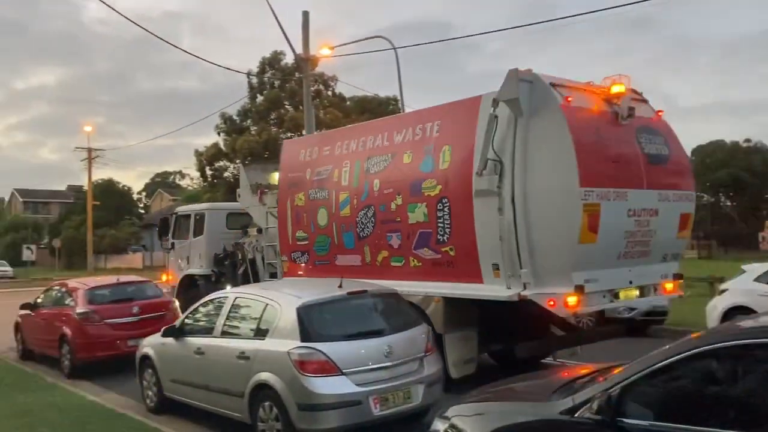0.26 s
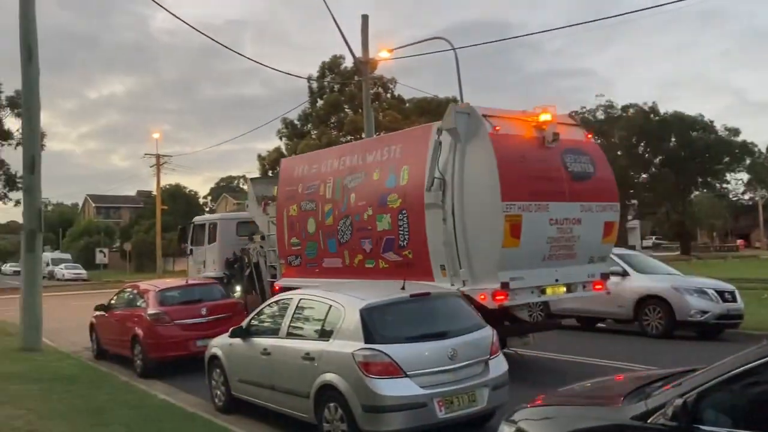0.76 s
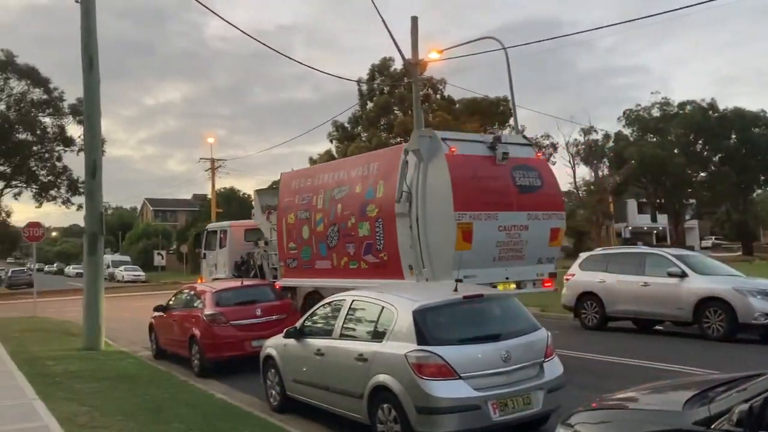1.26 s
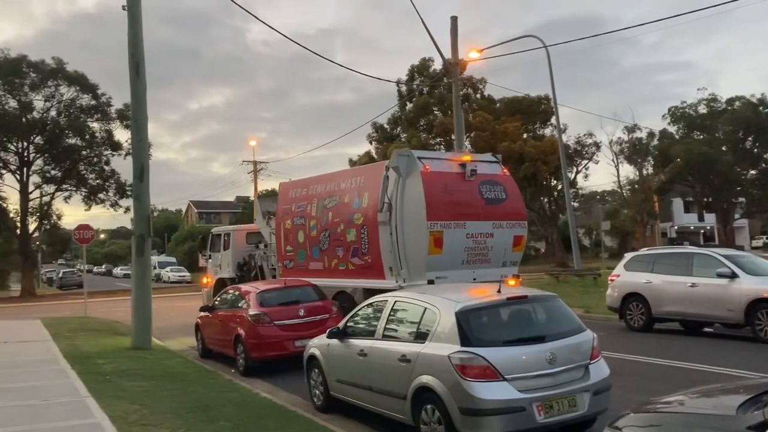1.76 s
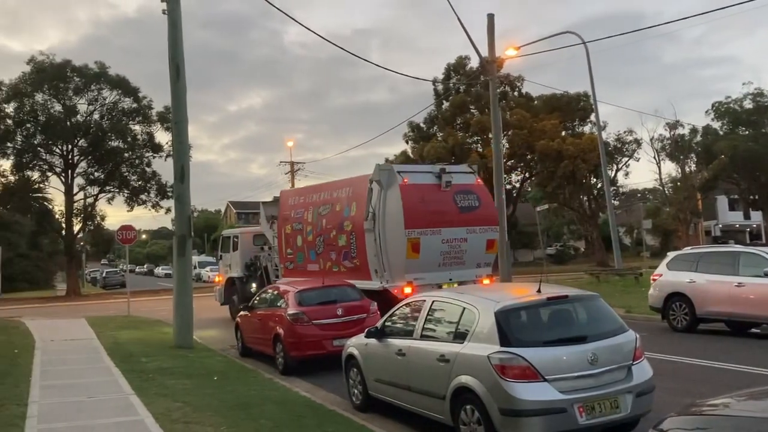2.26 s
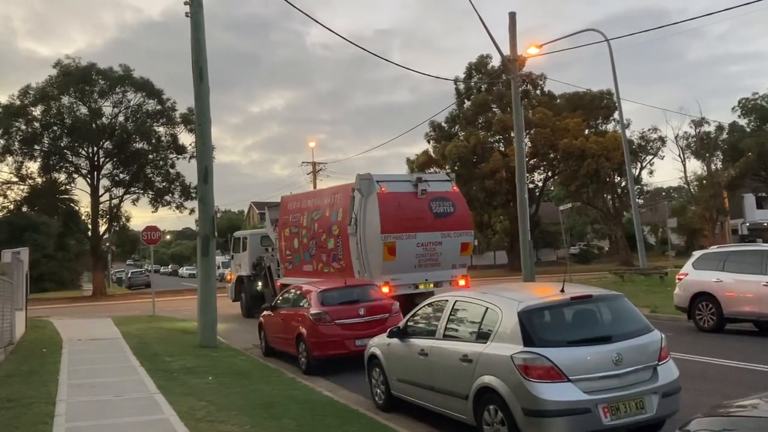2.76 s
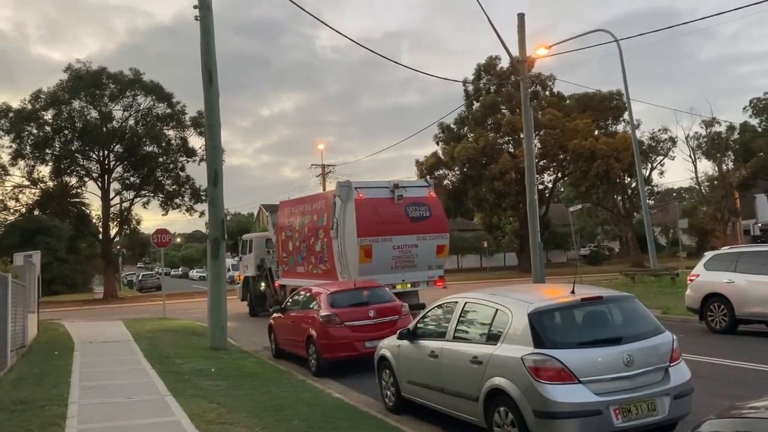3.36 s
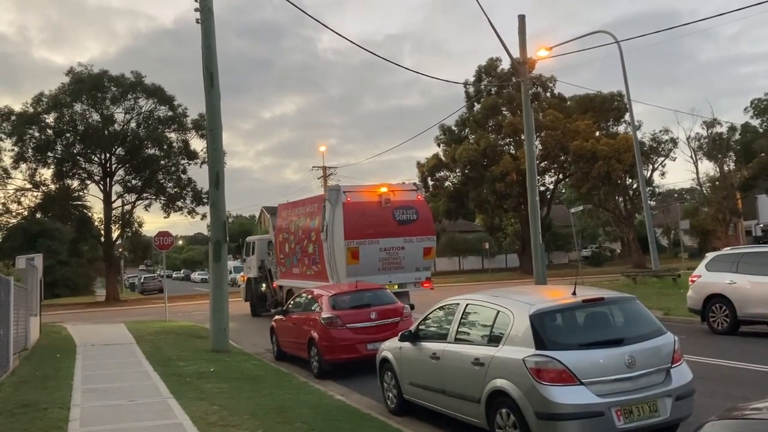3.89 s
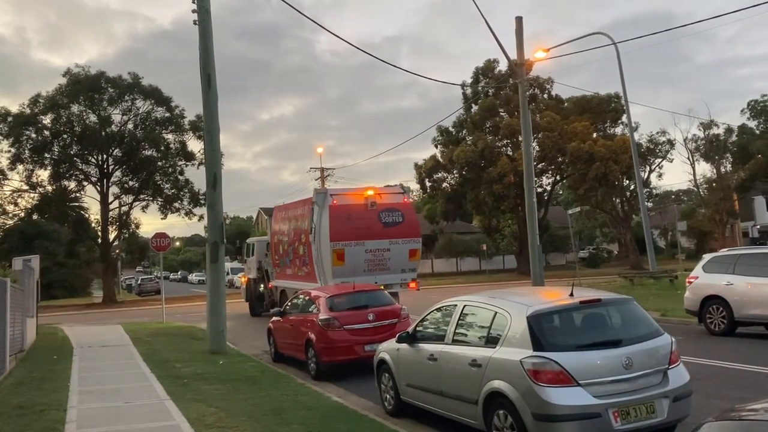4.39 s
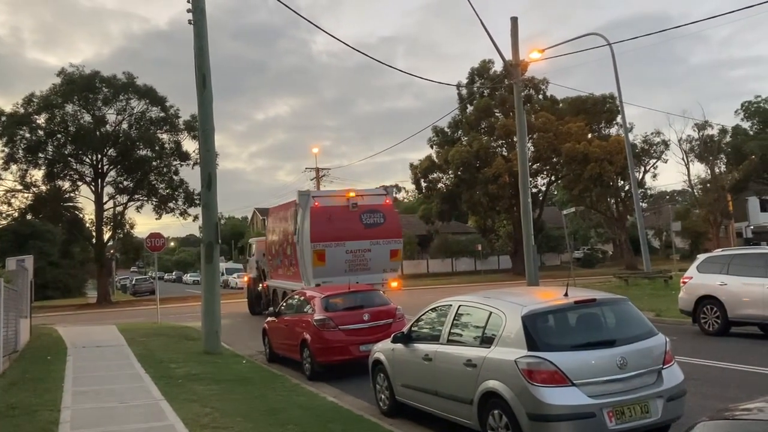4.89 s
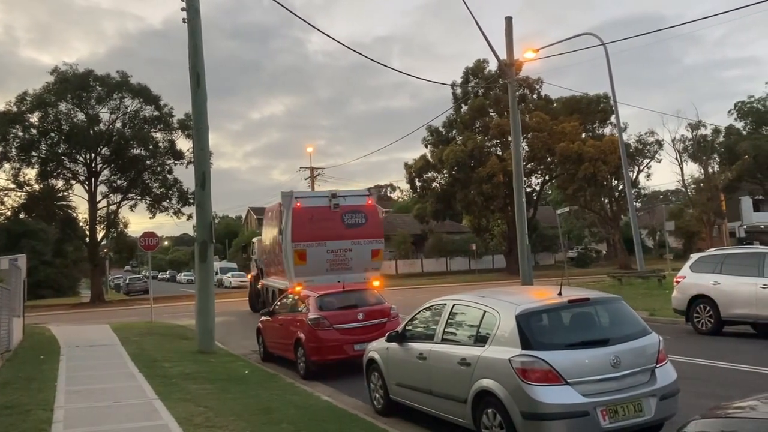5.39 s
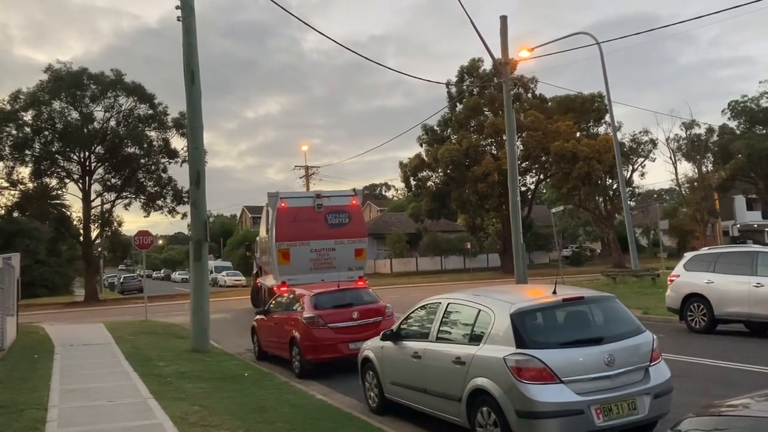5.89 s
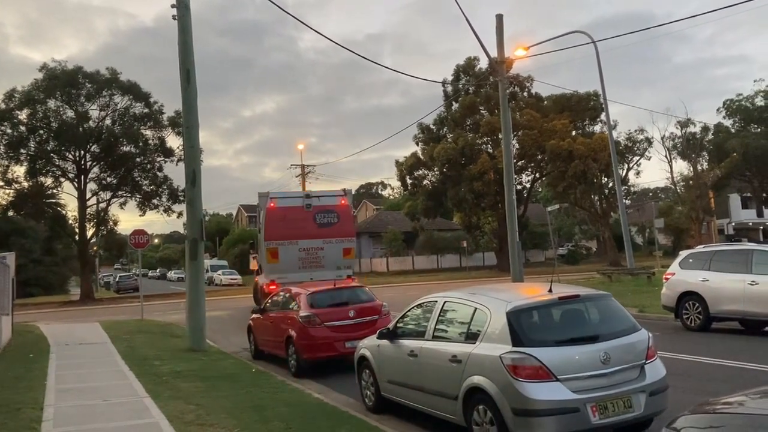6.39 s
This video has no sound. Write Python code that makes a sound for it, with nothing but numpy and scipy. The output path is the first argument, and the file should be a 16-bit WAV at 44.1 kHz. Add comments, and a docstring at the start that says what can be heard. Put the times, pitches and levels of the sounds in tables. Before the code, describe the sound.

Roadside stereo pickup of a refuse truck moving away. Strong low engine roar with diesel rattle and a faint falling turbo whistle winds down, with loose metal bumps. Thin piercing brake squeaks sing over a soft chugging idle. The engine then surges again, more distant and duller, shifts gear once, eases to near idle and just begins to rise at the end.

```python
"""Diesel refuse truck, stopping and pulling off

A truck rolls down a street, slows, squeals to a near stop, idles and pulls off through two gears.
Exhaust: sines at multiples of the firing rate. Rumble, clatter, hiss, street: shaped noise.
Turbocharger and brakes: fluttering sines. Body knocks: noise taps through panel modes.
Two spaced microphone ports hear it all."""
import sys
import numpy as np
from scipy import signal
from scipy.fft import rfft, irfft
from scipy.io import wavfile
from scipy.ndimage import uniform_filter1d

SR = 44100
rng = np.random.default_rng(int(sys.argv[2]) if len(sys.argv) > 2 else 0)


def makeup_ratio(level_db):
    """Linear amplitude ratio for a level in decibels (20 dB per factor of ten)."""
    decades = np.asarray(level_db, float) / 20
    return 10 ** decades


def log_audio(samples):
    """Write samples as a 16-bit WAV file to the path given in sys.argv[1]."""
    # one column per channel
    frames = np.atleast_2d(samples).T
    # limit to full scale, then quantise
    limited = np.clip(frames, -1, 1)
    pcm = np.round(limited * 32767).astype(np.int16)
    wavfile.write(sys.argv[1], SR, pcm)


N = 292812
T = np.arange(N) / SR

# engine course: t/s, firing rate f/Hz, exhaust tone level/dB, roar level/dB (effort and distance)
ENGINE = [(0.0, 84.5, -20.5, -26), (0.14, 80.6, -32, -29), (0.29, 81.2, -22.5, -29.5),
          (0.5, 71.4, -23.5, -31), (0.63, 65.16, -17, -32.5), (0.98, 61.9, -18.5, -32),
          (1.31, 56.99, -24.5, -35.5), (1.55, 41.8, -49, -43), (1.75, 33.98, -45, -46.5),
          (2.0, 32.6, -44, -45.5), (2.15, 32.56, -45, -44), (2.45, 32.55, -52, -46),
          (2.8, 32.59, -53, -48.5), (3.59, 33.02, -54, -48.5), (3.79, 42.7, -24.5, -41.5),
          (3.97, 50.8, -19.5, -38.5), (4.29, 58.7, -23, -38), (4.55, 61.26, -20, -38.5),
          (4.83, 53.46, -28.5, -40), (4.92, 52.47, -20.5, -40.5), (5.31, 56.44, -25.5, -40.5),
          (5.69, 56.1, -27.5, -41), (5.82, 50.67, -29, -42.5), (5.92, 45.26, -46, -49),
          (6.1, 31.4, -45, -47.5), (6.5, 36.27, -46.5, -50), (6.57, 39, -37, -47.5),
          (6.64, 41.7, -27, -45.5)]
# octave and twelfth through the tailpipe: f/Hz, level over roar/dB
PIPE = [(55, 6), (65, 12.5), (86, 7.5), (100, 1), (120, -2), (150, 0.5), (170, 0.5), (190, -6),
        (250, -11.5)]
# strength of orders above the exhaust tone; choked while coasting,
# fuller once the tailpipe faces the listener: t/s, level/dB
OVERTONES = [(0, -4), (.45, -3.5), (.6, -8), (1.2, -5), (1.6, -4), (1.8, 3), (1.98, -8), (2.15, -6),
             (2.5, 0), (4.75, 1), (4.86, -5), (4.93, 0), (5.84, 4), (5.9, -10), (6.45, -7), (6.58, 5.5)]
# weaker engine orders: multiple of firing rate, level over roar/dB
GROWL = [(1.5, -18), (2.5, -9.5), (3.5, -9.5), (4, -14.5), (5, -17), (6, -11.5), (7, -16)]
# relative noise spectra: f/Hz, level/dB per Hz
RUMBLE_SPECTRUM = [(25, -25), (45, -9), (70, -12), (110, 1), (160, -2), (250, -10.5), (310, -4.5),
                   (410, -7), (540, -14.5), (800, -19), (1500, -78)]
CLATTER_SPECTRUM = [(300, -32), (550, -5.5), (760, 2), (1050, -3), (1500, -5), (1900, -13.5), (2300, -9.5),
                    (3000, -13.5), (4000, -14), (4350, -17), (4900, -15), (5800, -21), (8000, -38)]
HISS_SPECTRUM = [(3500, -3), (5500, -7), (6900, 1), (7500, -2.5), (9000, 2), (10500, -2.5), (12000, -9.5),
                 (13500, -10.5), (14500, -16.5), (15200, -34), (15900, -31)]
# layer laws: level/dB at the reference roar, slope/dB per dB of roar, fade with distance/dB per s
CLATTER_LAW = (-36.5, .9, -0.071)
HISS_LAW = (-45.5, 0.9, -0.24)
# lowest brake mode: t/s, f/Hz, level/dB
SQUEAL = [(2.38, 8290, -73), (2.44, 8360, -43), (2.522, 8380, -31.5), (2.63, 8340, -44),
          (2.684, 8323, -28.5), (2.83, 8250, -48), (3.0, 8290, -37.5), (3.14, 8570, -36),
          (3.184, 8400, -33), (3.23, 8440, -37.5), (3.58, 8430, -64)]
# higher brake modes, caught for a moment: peak t/s, f/Hz, level/dB, rise/s per 30 dB, fall/s per 30 dB
CHIRPS = [(2.56, 11030, -39, .3, .26), (2.55, 11900, -47, .1, .16), (2.64, 14480, -48, .6, .18),
          (2.972, 10700, -48.5, .09, .08), (3.1, 13930, -45, .16, .2), (3.184, 11730, -57, .12, .15),
          (3.338, 10730, -41.5, .09, .22)]
# body knocks: t/s, level/dB, centre f/Hz, spread/octaves, rattle length/s
KNOCKS = [(0.207, -21, 340, 1.26, 0.032), (0.248, -26, 400, 1.12, 0.088), (0.973, -29, 121, 0.12, 0.047),
          (0.978, -21, 1287, 1, .032), (1.098, -35, 7000, .45, 0.014), (1.109, -28, 2940, 0.89, 0.021),
          (2.402, -34, 217, .76, 0.019), (2.438, -37, 500, 1.04, 0.0058), (2.463, -41, 750, 0.66, 0.07),
          (2.526, -42.5, 450, 0.77, 0.0069), (3.702, -40, 600, 1.24, 0.0086)]
# steel panel modes: f/Hz, width/Hz, level/dB
PANEL_MODES = [(199, 84, 6), (400, 200, 0.5), (750, 180, 2), (955, 230, 0), (1610, 260, -7),
               (2120, 640, -0.5), (3280, 320, 1.5), (4470, 1200, -2.5), (7100, 3000, -9)]
# steady idle shake and far traffic, relative spectrum: f/Hz, level/dB per Hz
STREET_SPECTRUM = [(25, -30), (45, -10), (65, 1), (100, -3.5), (250, -12.5), (420, -15), (600, -24),
                   (1050, -14.5), (1300, -21.5), (2500, -26.5), (5000, -36.5), (10000, -49), (13000, -128),
                   (15000, -75)]
# steady narrow fuzzy tones in the noise: f/Hz, width/Hz, lift/dB
DRONES = [(252.6, 15.6, 5), (313, 6.3, 3.5), (406.4, 5.8, 2.5), (782, 7, 4.5), (1018, 14, 6.5),
          (2245, 11, 8.5), (4310, 32, 9.5)]
# right port against left: f/Hz, likeness/0-1, level/dB
PORTS = [(0, 1, 1.3), (250, .92, 2.2), (450, .82, 2), (620, .7, -3), (850, .5, -4.5), (1050, .35, -6),
         (1400, .4, -5.5), (2000, .5, -3), (3350, .3, -2.5), (4300, .55, -1), (4850, .3, -1.5),
         (6150, .4, 0), (6500, .9, 0), (7300, 1, 0)]
# treble bands where left and right are held alternately in and out of phase: from f/Hz, to f/Hz
LOCKED_BANDS = [(6500, 7300), (8800, 9500), (11000, 11800), (13100, 13600), (15300, 16000)]


def evened(x):
    """Scales to rms 1."""
    return x / np.sqrt(np.mean(x ** 2) + 1e-20)


def curves(rows, at=T):
    """Joins table rows by straight lines over the first column."""
    x, *columns = np.transpose(rows)
    return [np.interp(at, x, column) for column in columns]


def coloured(x, spectrum):
    """Filters by a spectrum drawn on a log-frequency axis; rms 1."""
    f_hz, db = np.transpose(spectrum)
    hz = np.fft.rfftfreq(x.shape[-1], 1 / SR)
    gain = makeup_ratio(np.interp(np.log(hz + 1), np.log(f_hz), db))
    return evened(irfft(rfft(x) * gain, x.shape[-1]))


def wander(hz, shape=N):
    """Random flutter of rms 1, mainly in the two octaves below hz."""
    band = signal.butter(1, [hz / 4, hz], "band", fs=SR)
    return evened(signal.lfilter(*band, rng.standard_normal(shape)))


def layer_db(law):
    """Level following the roar by a share and fading with distance."""
    db, share, fade_db_per_s = law
    reference_roar_db = -38
    return db + share * (curves(ENGINE)[2] - reference_roar_db) + fade_db_per_s * T


def exhaust():
    """Sines at firing-rate multiples; pitch and level flutter more when the lowest two are weak."""
    hz, tone_db, roar_db = curves(ENGINE)
    overtone_db = roar_db + curves(OVERTONES)[0]
    levels_db = [tone_db] + [overtone_db + curves(PIPE, order * hz)[0] for order in (2, 3)]
    slack = np.clip((-30.5 - np.maximum(levels_db[0], levels_db[1])) / 6, 0, 1)
    turns = np.cumsum(hz * (1 + (0.0014 + 0.02 * slack) * wander(6.34))) / SR
    orders = [(order, db + (0.5 * order + 0.93 * slack) * wander(9.5))
              for order, db in enumerate(levels_db, 1)]
    orders += [(order, db + overtone_db + 3.0 * wander(6.4)) for order, db in GROWL]
    return sum(np.sqrt(2) * makeup_ratio(db) * np.cos(2 * np.pi * (order * turns + 0.11 * order))
               for order, db in orders)


def puffs():
    """Pressure decay after each firing; cylinders fire unevenly."""
    turns = np.cumsum(curves(ENGINE)[0]) / SR
    blow = makeup_ratio(3.5 * rng.standard_normal(1000))[turns.astype(int)]
    return blow * np.exp(-(turns % 1) / 0.57)


def rumble(puff):
    """Low engine noise, lightly chopped by the firings; rows: direct, scattered."""
    noise = rng.standard_normal((2, N)) * (1 + 0.21 * puff)
    return coloured(noise, RUMBLE_SPECTRUM) * makeup_ratio(curves(ENGINE)[2] + 0.55 * wander(6.4))


def clatter(puff):
    """Diesel mid-band noise, chopped by the firings; rows: direct, scattered."""
    noise = rng.standard_normal((2, N)) * (1 + 0.17 * puff)
    return coloured(noise, CLATTER_SPECTRUM) * makeup_ratio(layer_db(CLATTER_LAW) + 0.79 * wander(37))


def hiss(puff):
    """Treble engine noise, chopped by the firings; rows: direct, scattered."""
    noise = rng.standard_normal((2, N)) * (1 + 0.11 * puff)
    return coloured(noise, HISS_SPECTRUM) * makeup_ratio(layer_db(HISS_LAW) + 0.9 * wander(26))


def whine():
    """Fuzzy turbocharger whistle: pitch decays as it spins down, level as the truck turns away."""
    start_hz, spin_down_s, jitter_hz = 16500, 3.0, 250  # spin-down to 1/e
    hz = start_hz * np.exp(-T / spin_down_s) + jitter_hz * wander(293)
    peak_db = layer_db(HISS_LAW) - 7 - 3.0 * T ** 2
    return makeup_ratio(peak_db) * np.sin(2 * np.pi * np.cumsum(hz) / SR)


def brakes():
    """Disc modes sung by stick-slip: near sines fluttering in pitch and strength."""
    modes = [curves(SQUEAL)]
    for peak_s, hz, db, rise_s, fall_s in CHIRPS:
        drop = np.maximum((peak_s - T) / rise_s, (T - peak_s) / fall_s)
        modes.append((hz, db - 30 * drop))
    braking = 1.0 * (T > SQUEAL[0][0]) * (T < SQUEAL[-1][0])
    out = np.zeros(N)
    for hz, db in modes:
        turns = np.cumsum(hz * (1 + 0.003 * wander(70))) / SR
        out += np.sqrt(2) * makeup_ratio(db + 3.8 * wander(37)) * np.sin(2 * np.pi * turns)
    return uniform_filter1d(braking, size=900) * out


def knocks():
    """Bumps rattle uneven taps into the panel modes near a centre, then die away."""
    size = 16384
    out = np.zeros((2, N + size))
    t, hz = np.arange(size) / SR, np.fft.rfftfreq(size, 1 / SR)
    panels = sum(makeup_ratio(db) * 1j * hz * width / (f ** 2 - hz ** 2 + 1j * hz * width)
                 for f, width, db in PANEL_MODES)
    for start_s, db, centre_hz, octaves, length_s in KNOCKS:
        taps = rng.standard_normal((2, size)) * makeup_ratio(1.7 * wander(390, size))
        # first blow stands out more in short rattles
        taps[:, 70:74] += min(0.04 / length_s, 7)
        attack = np.minimum(t / (0.001 + 0.1 * length_s), 1)
        # 60 dB tail lasts 7.4 rattle lengths
        decay = makeup_ratio(-60 * np.maximum(t / length_s - 1, 0) / 7.4)
        reach = np.exp(-0.5 * (np.log2((hz + 1) / centre_hz) / octaves) ** 2)
        shape = panels * reach
        shape = shape / np.sqrt(np.mean(abs(shape) ** 2))
        ring = irfft(rfft(taps * decay * attack) * shape, size)
        start = round(start_s * SR)
        out[:, start:start + size] += makeup_ratio(db) * ring
    return out[:, :N]


def street():
    """Steady idle shake and far traffic as noise; rows: direct, scattered."""
    return coloured(rng.standard_normal((2, N)), STREET_SPECTRUM) * makeup_ratio(-38 + 1.0 * wander(18.6))


def patchy(x, depth_db):
    """Colour drifting in patches some tens of Hz by a fifth of a second."""
    z = signal.stft(x, nperseg=2048)[2]
    patches = uniform_filter1d(rng.standard_normal(z.shape[1:]), size=3, axis=0)
    patches = evened(uniform_filter1d(patches, size=7, axis=1))
    return signal.istft(z * makeup_ratio(depth_db * patches), nperseg=2048)[1][:, :N]


def droning(x):
    """Narrow fixed boosts lift fuzzy tones out of the noise."""
    hz = np.fft.rfftfreq(N, 1 / SR)
    lift_db = sum(db / (1 + (2 * (hz - f) / width) ** 2) for f, width, db in DRONES)
    return irfft(rfft(x) * makeup_ratio(lift_db), N)


def ports(direct, scattered):
    """Right port hears the left's sound later, partly replaced by sound scattered in the street."""
    delay_s, bass_hz = 3.02 / 6500, 45  # delay shrinks in the bass
    hz, edges_hz = np.fft.rfftfreq(N, 1 / SR), np.ravel(LOCKED_BANDS)
    same, db = curves(PORTS, hz)
    # left-right phase held flat in each band, stepping half a turn between
    steps = np.interp(hz, edges_hz, np.arange(len(edges_hz)) // 2)
    lag_turns = np.minimum(hz, edges_hz[0]) * delay_s * hz / (hz + bass_hz) - steps / 2
    same = same - 0.2 * np.sin(np.pi * steps) ** 2  # less alike between bands
    right = same * np.exp(-2j * np.pi * lag_turns) * rfft(direct)
    right = right + np.sqrt(1 - same ** 2) * rfft(scattered)
    return np.array([direct, irfft(right * makeup_ratio(db), N)])


def scene():
    """All sources at the two ports; only noise and knocks have a scattered path."""
    puff = puffs()
    noise = rumble(puff) + clatter(puff) + hiss(puff) + street()
    direct, scattered = droning(patchy(noise, depth_db=2.1)) + knocks()
    tones = exhaust() + whine() + brakes()
    return ports(direct + tones, scattered)


def top_cut(x):
    """Nothing passes above the cut-off."""
    return signal.sosfilt(signal.butter(12, 17010, fs=SR, output="sos"), x)


def record(dry):
    """Band limit at 15.8 kHz, then the finished mix goes out."""
    low_pass = signal.firwin(511, 15800, window=("kaiser", 9), fs=SR)
    mix = signal.oaconvolve(dry, low_pass[None], "same")
    return top_cut(mix)


dry = scene()
out = record(dry)
log_audio(out)
```